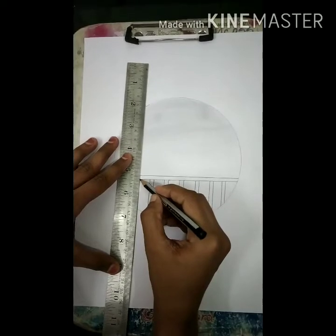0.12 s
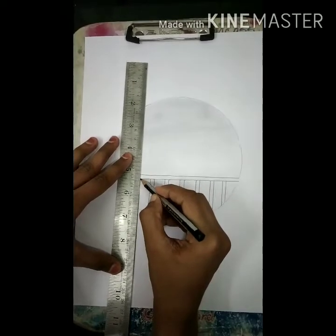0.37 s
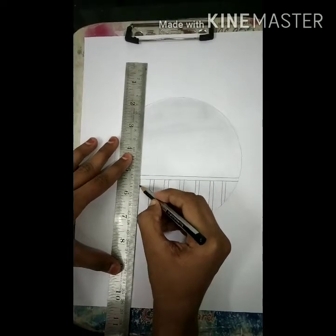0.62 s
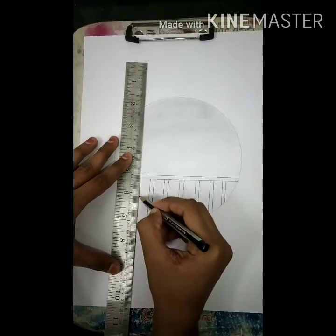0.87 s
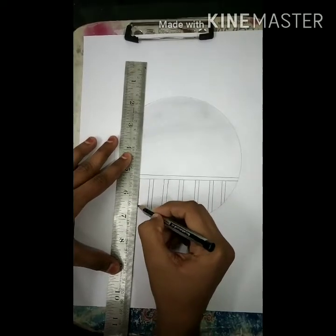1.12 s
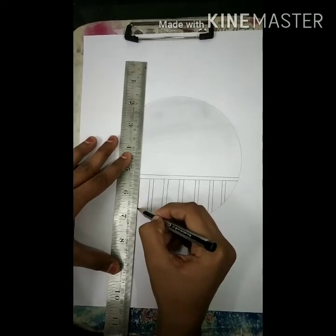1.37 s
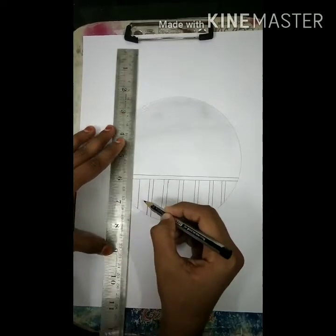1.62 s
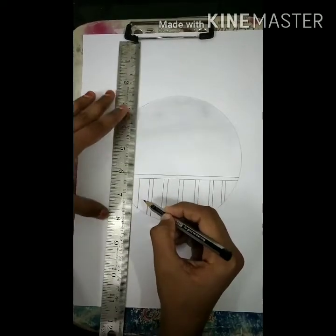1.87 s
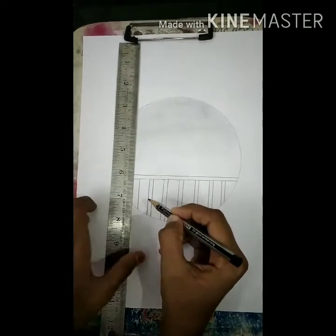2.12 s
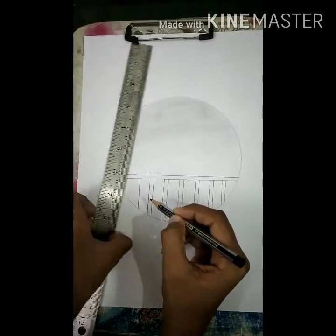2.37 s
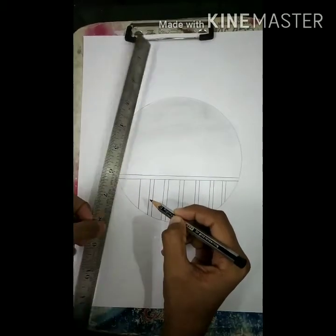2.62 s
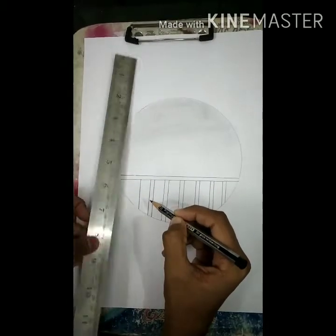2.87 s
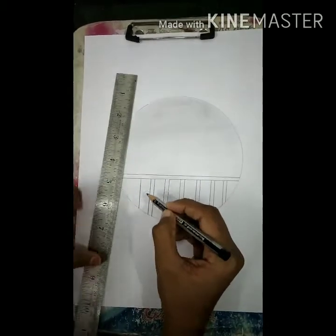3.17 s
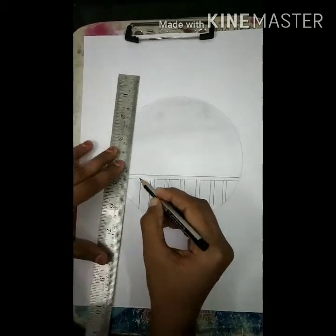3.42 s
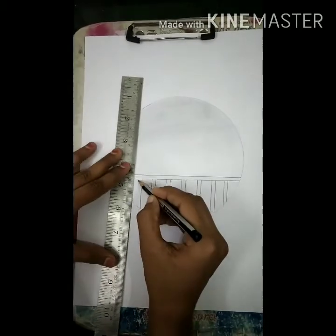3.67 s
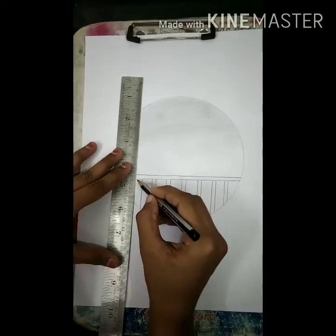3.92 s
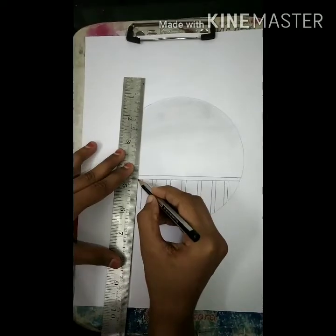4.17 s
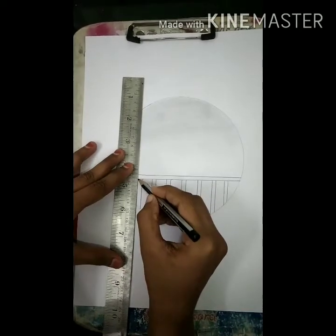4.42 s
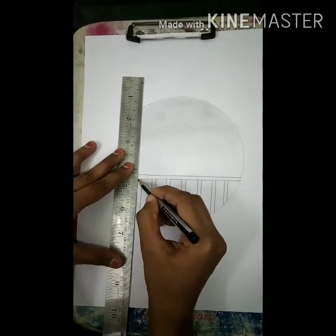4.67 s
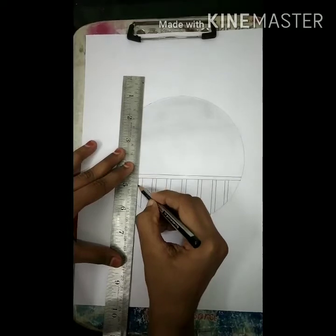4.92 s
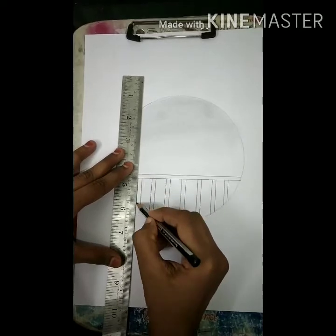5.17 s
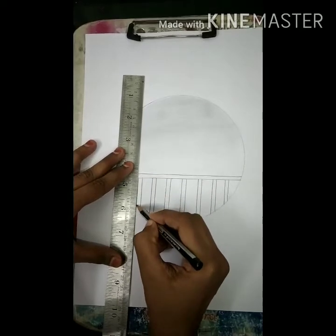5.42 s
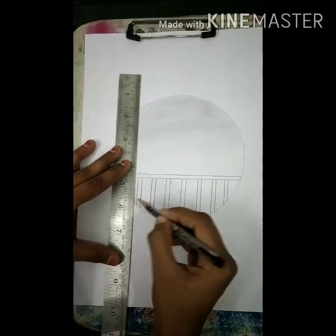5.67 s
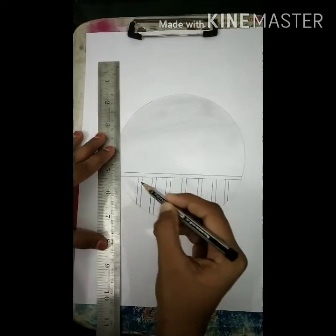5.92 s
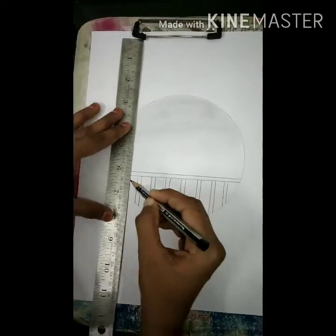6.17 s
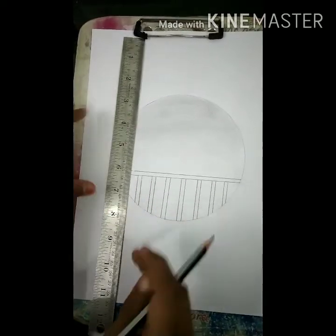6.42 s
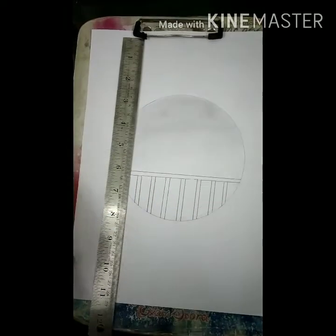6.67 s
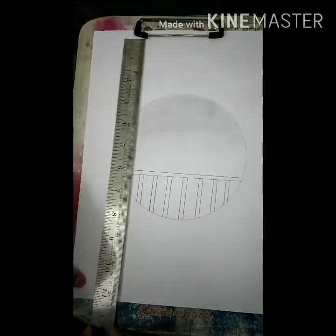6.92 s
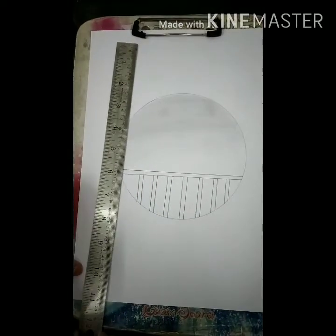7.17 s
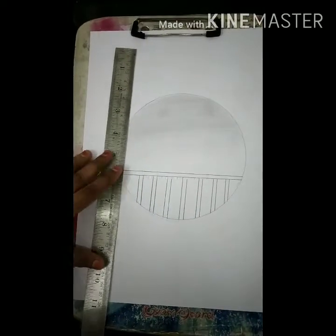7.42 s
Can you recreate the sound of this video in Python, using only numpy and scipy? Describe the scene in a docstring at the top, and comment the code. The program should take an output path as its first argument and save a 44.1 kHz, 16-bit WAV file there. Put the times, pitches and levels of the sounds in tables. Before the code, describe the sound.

Close stereo microphones at a desk in a small room with a steady fan drone. A faint pencil stroke hisses on paper, a loose part rattles, then a steel ruler scrapes and ticks, rings thinly and high, and lands with a flat slap and short buzz. After another rattle and a second pencil stroke come more papery slides, a sharp tick and a last rattle.

```python
"""Pencil and steel ruler on a clipboard

A hand draws two pencil lines along a steel ruler, then slides, lifts and drops the ruler.
Slides and pencil are coloured clicks of paper grain; ticks, slap and ringing steel are struck resonances.
A fan drones as shaped noise and shakes the desk; a loose part on it rattles three times as knocked modes.
Two close microphones listen: levels, delays and partly unlike noise differ between left and right.
"""
import sys
import numpy as np
from scipy import signal
from scipy.io import wavfile
from scipy.ndimage import uniform_filter1d

SR = 44100
rng = np.random.default_rng(int(sys.argv[2]) if len(sys.argv) > 2 else 0)


def log_audio(samples):
    """Write samples as a 16-bit WAV file to the path given in sys.argv[1]."""
    # one column per channel
    frames = np.atleast_2d(samples).T
    # limit to full scale, then quantise
    limited = np.clip(frames, -1, 1)
    pcm = np.round(limited * 32767).astype(np.int16)
    wavfile.write(sys.argv[1], SR, pcm)


def gain_from_db(level_db):
    """Convert decibel levels to linear amplitude factors (20 dB per decade)."""
    decades = np.asarray(level_db, float) / 20
    return 10 ** decades


N = 333043
LAG = 9  # samples between the microphones


def evened(x):
    """Scales to rms 1."""
    return x / np.sqrt(np.mean(x ** 2) + 1e-20)


def read(points, hz):
    """Reads a table on a log-frequency axis."""
    f, value = np.transpose(points)
    return np.interp(np.log(hz + 1), np.log(f + 1), value)


def add(mix, s, sound):
    """Adds a sound at time s."""
    part = mix[:, round(s * SR):][:, :sound.shape[-1]]
    part += sound[..., :part.shape[1]]


def resonate(x, hz, width):
    """Shifts the curve hz down to zero, smooths, and shifts back: a resonance of gain 1."""
    turn = np.exp(2j * np.pi * np.cumsum(hz * np.ones(len(x))) / SR)
    r = np.exp(-np.pi * width / SR)
    return 2 * (turn * signal.lfilter([1 - r], [1, -r], x / turn)).real


def grit(count, per_s, spread_db):
    """Sparse clicks of random sign, a few of them large."""
    size_db = spread_db * np.minimum(rng.exponential(1, count), 3.5)
    size = gain_from_db(size_db) * rng.choice([-1., 1.], count)
    return evened(size * (rng.random(count) < per_s / SR))


def wander(count, samples):
    """Slow random curve of rms 1: noise averaged over a number of samples."""
    return evened(uniform_filter1d(rng.standard_normal(count), samples))


def patchwork(shape, bins, frames):
    """Random patches of rms 1 over frequency and time."""
    noise = uniform_filter1d(rng.standard_normal(shape), bins, axis=0)
    return evened(uniform_filter1d(noise, frames, axis=1))


def placed(x, pan_db, lag):
    """Two channels with a level step and a delay of the right one."""
    return np.array([x * gain_from_db(pan_db / 2), np.roll(x, lag) * gain_from_db(-pan_db / 2)])


def swells(t, s, rise_s, fall_s, db, round_top=0.054):
    """Power of each event over time: a climb in dB to a rounded peak, then a fall."""
    late = t[:, None] - np.asarray(s)
    rising, falling = late / np.maximum(rise_s, .001), late / np.maximum(fall_s, .001)
    away = np.where(late < 0, rising, falling)
    return gain_from_db(2 * (db - 10 * (np.hypot(away, round_top) - round_top)))


# spectrum shape of the drone: f/Hz, density/dB per Hz
DRONE_SPECTRUM = [(18, -77), (30, -51), (55, -89), (108, -41), (188, -2.5), (251, 1.5), (440, -4.5),
                  (478, -8), (560, -8.5), (735, -9), (931, -6), (1490, -13), (2800, -22), (6480, -37.5),
                  (12800, -35.5), (15800, -33)]
# drone strength, swing weighted by frequency: t/s, level/dB
DRONE_LEVEL = [(0.0, -51), (1.14, -48), (1.47, -53), (1.81, -48.5), (1.85, -53.5), (2.63, -48.5),
               (2.78, -54), (3.39, -47), (4.5, -50), (4.64, -47.5), (5.61, -45.5), (5.84, -51), (5.92, -48),
               (6.12, -51), (6.41, -46), (7.0, -49.5), (7.55, -51)]
# drone at the two microphones: f/Hz, left over right/dB
DRONE_BALANCE = [(60, -8), (240, 1.5), (950, 0), (3770, 0), (15000, 1)]
# room resonances in the drone: f/Hz, width/Hz, lift/dB
ROOM_HUMS = [(210, 11.5, 2.5), (238.9, 9.6, 5.5), (278, 8, 1), (306, 12.3, 5), (363.7, 9.6, 3.5),
             (418, 19, 3), (449, 16, 4.5), (581, 30, 3.5), (906, 11, 2.5), (1038, 37, 2)]
MIC_SPACING_M = 0.17
FAN_SHARE, FAN_LAG_S = 0.25, 0.00026  # straight path from the fan, left microphone first


def drone():
    """Air noise of the fan with drifting patches, partly alike at both microphones."""
    frames, hz = N // 1024 + 5, np.fft.rfftfreq(4096, 1 / SR)
    a, b, c, d = rng.standard_normal((4, len(hz), frames))
    from_all_sides = np.sinc(2 * hz * MIC_SPACING_M / 343)
    straight = np.exp(-2j * np.pi * hz * FAN_LAG_S - (hz / 5000) ** 2)
    same = ((1 - FAN_SHARE) * from_all_sides + FAN_SHARE * straight)[:, None]
    left = a + 1j * b
    right = same * left + np.sqrt(np.maximum(1 - abs(same) ** 2, 0)) * (c + 1j * d)
    balance = gain_from_db(read(DRONE_BALANCE, hz) / 2)[:, None]
    level_db = np.interp(np.arange(frames) * 1024 / SR, *np.transpose(DRONE_LEVEL))
    bass_weight = np.clip(1.1 - 0.17 * np.log2(hz / 300 + 1), 0, 2)[:, None]  # mostly the bass swells
    swell_db = (level_db - level_db.mean()) * bass_weight
    hum_db = sum(db / (1 + (2 * (hz - f) / w) ** 2) for f, w, db in ROOM_HUMS)
    colour_db = (read(DRONE_SPECTRUM, hz) + hum_db)[:, None]
    patches_db = 1.4 * patchwork((len(hz), frames), 6, 8)
    z = np.array([left * balance, right / balance]) * gain_from_db(colour_db + patches_db + swell_db)
    sound = signal.istft(z, nperseg=4096, noverlap=3072)[1][:, :N]
    return gain_from_db(level_db.mean() + 3.0) * evened(sound)


# a hand leaning on the desk: t/s, rise/s per 10 dB, fall/s per 10 dB, level/dB
HAND_LEANS = [(0.7, .3, 0.073, -87), (2.14, 0.17, .15, -80), (2.54, 0.13, 0.18, -71.5),
              (2.98, .1, .15, -80), (6.22, 0.39, 0.5, -70.5), (7.3, 0.33, .4, -76.5)]
RUMBLE_DB, RUMBLE_DB_PER_DRONE_DB = -84.5, 1.3


def rumble():
    """Deep shaking of the desk: follows the drone, stronger when a hand leans on it."""
    band = signal.butter(2, [90, 140], "bandpass", fs=SR, output="sos")
    low = signal.sosfilt(band, rng.standard_normal((3, N)))
    t = np.arange(N) / SR
    drone_db = np.interp(t, *np.transpose(DRONE_LEVEL))
    steady = gain_from_db(RUMBLE_DB + RUMBLE_DB_PER_DRONE_DB * (drone_db - drone_db.mean()))
    leaning = swells(t, *np.transpose(HAND_LEANS)).sum(1)
    return evened(low[0] + 0.27 * low[1:]) * np.sqrt(steady ** 2 + leaning)


# base colour of paper friction: f/Hz, density/dB per Hz
PAPER_SPECTRUM = [(940, -23.5), (1600, -6), (3750, -7.5), (4210, -8.5), (4590, -8.5), (6670, -9),
                  (7200, -8.5), (11200, -7.5), (15800, -12.5)]
# ruler and hands sliding over paper:
# peak t/s, rise/ms per 10 dB, fall/ms per 10 dB, level/dB, brightness/dB per octave above 3300 Hz
SLIDE_EVENTS = [(0.15, 21, 120, -65.5, 3), (0.63, 270, 520, -63.5, -3), (0.83, 62, 64, -59.5, -3),
                (1.385, 48, 15, -55.5, 6), (1.404, 12, 45, -55, 5), (1.47, 60, 60, -65, 7),
                (1.525, 22, 13, -56, 2), (1.54, 16, 29, -45, 4), (1.565, 15, 26, -53, -8),
                (1.66, 150, 76, -59.5, 1.5), (1.99, 69, 206, -60, 3.5), (2.1, 10, 155, -56.5, 3),
                (2.14, 66, 32, -53, 3), (2.212, 46, 30, -54, 2), (2.3, 15, 60, -66, 3),
                (2.452, 4, 42, -59.5, -5.5), (2.47, 5, 41, -46.5, -1), (2.5406, 2.2, 6, -36, 1.5),
                (2.546, 2.5, 2.5, -35.5, 3.5), (2.55, 2, 4, -45, 4), (2.556, 5, 32, -50, -1),
                (2.597, 5, 8, -41, 3), (2.612, 10, 40, -52.5, 1), (2.657, 2, 2.5, -44, 4),
                (2.7, 40, 63, -61, 0), (2.737, 60, 35, -54, 7.5), (2.833, 21, 110, -59.5, 4),
                (2.858, 34, 20, -62, -2), (2.992, 0, 60, -43, -2.5), (3.035, 35, 142, -54, -6),
                (3.19, 20, 104, -56, 1), (3.31, 211, 65, -58.5, 1), (3.416, 4, 70, -51.5, -2),
                (3.68, 64, 76, -54.5, -4.5), (3.845, 46, 50, -64, 0), (4.126, 28, 146, -64, -5),
                (4.237, 10, 300, -65.5, -8), (4.396, 25, 100, -58, -5), (4.815, 110, 246, -59, -2),
                (5.045, 60, 54, -57.5, -5.5), (5.237, 197, 44, -64.5, -6), (5.386, 252, 200, -62.5, -6),
                (5.56, 40, 24, -55.5, 1), (5.6, 48, 46, -48.5, -0.5), (5.65, 27, 21, -55, 1),
                (5.77, 48, 54, -59.5, 1), (5.847, 46, 120, -53, 2.5), (5.93, 50, 60, -56, 4),
                (6.01, 80, 53, -52, 3.5), (6.177, 9, 10, -53, 5), (6.183, 2.5, 2, -43, 3.5),
                (6.2, 12, 100, -58, -1.5), (6.293, 100, 150, -59.5, -4), (6.55, 10, 142, -59.5, -5),
                (6.67, 34, 66, -60, 0), (6.883, 64, 293, -60, 2.5), (7.1, 60, 262, -57.5, -2.5),
                (7.287, 50, 300, -61, 4), (7.53, 100, 899, -56.5, 0.5)]
REST_DB, REST_TILT_DB_PER_OCTAVE = -70.5, -3  # faint hiss of resting hands


def slide():
    """Dense paper-fibre clicks coloured by the sheet, with a brightness for each slide."""
    rub = grit(N, 2500, 3.8)
    wide = np.array([grit(N, 4000, 1.8), grit(N, 4000, 2.3)])  # other spots under the long ruler
    clicks = 0.25 * placed(rub, -10.0, -LAG) + 0.93 * wide
    hz, t, z = signal.stft(clicks, SR, nperseg=256, noverlap=192)
    s, rise_ms, fall_ms, level_db, tilt_db = np.transpose(SLIDE_EVENTS)
    power = swells(t, s, rise_ms / 1000, fall_ms / 1000, level_db)
    rest = gain_from_db(2 * REST_DB)
    total = power.sum(1) + rest
    bright_db = (power @ tilt_db + rest * REST_TILT_DB_PER_OCTAVE) / total
    octaves = np.log2(np.maximum(hz, 3300) / 6500)[:, None]
    colour = gain_from_db(read(PAPER_SPECTRUM, hz)[:, None] + octaves * bright_db)
    colour /= np.sqrt(np.sum(colour[23:58] ** 2, axis=0) / 128)  # levels refer to about 4-10 kHz
    colour *= gain_from_db(1.87 * patchwork(colour.shape, 7, 24))  # the contact shifts, so bands come and go
    sound = signal.istft(z * colour, SR, nperseg=256, noverlap=192)[1][:, :N]
    z = signal.stft(sound, nperseg=1024, noverlap=768)[2]
    # narrow bands of the hiss drift in and out at random
    narrow_bands = evened(gain_from_db(3.4 * patchwork(z.shape[1:], 3, 12)))
    sound = signal.istft(z * narrow_bands, nperseg=1024, noverlap=768)[1][:, :N]
    judder = gain_from_db(1.04 * wander(len(t), 10))  # the motion catches and slips
    return sound * np.interp(np.arange(N) / SR, t, np.sqrt(total) * judder)


# ruler ticks: t/s, peak level/dB, centre f/Hz, left over right/dB, thud level/dB
RULER_TICKS = [(0.143, -42, 11000, 9, -72), (1.002, -38, 12000, 0, -60), (1.5613, -34.5, 3080, -2, -30.5),
               (2.0777, -18.5, 13000, 7, -29), (2.4681, -32, 8420, -6, -32), (2.5399, -17, 8300, -5, -37),
               (2.546, -19, 9400, -8, -57), (2.5978, -30, 9400, -4, -43), (2.6568, -22.5, 11300, -7, -60),
               (2.8465, -56, 2530, 1, -30), (2.862, -50, 2530, 1, -37), (3.4118, -38, 10800, -5, -49),
               (6.0413, -48, 2100, -10, -36), (6.2717, -23, 7040, 2.5, -46)]
# clipboard modes: f/Hz, level/dB, t60/s
BOARD_MODES = [(960, -12, 0.016), (1380, -9, 0.018), (1935, 3.5, 0.0091), (2235, 2.5, 0.01)]
CRACK_T60_S, BITE_WIDTH_PER_HZ = 0.0066, 0.82  # width of each resonator over its centre


def tick(s, peak_db, hz, pan_db, thud_db):
    """A steel edge scuffs the board: a short burst of grit and a dull thud."""
    t = np.arange(SR // 8) / SR
    scuffs = rng.standard_normal((3, len(t))) * gain_from_db(-60 * t / CRACK_T60_S) * np.tanh((t / .0003) ** 2)
    scuffs[0, 8] += 5.0  # the edge bites once
    width = BITE_WIDTH_PER_HZ * hz
    crack = np.array([resonate(resonate(x, hz, width), hz, width) for x in scuffs])
    crack = signal.lfilter([1, -2, 1], [1, -1.5, .6], crack)  # a thin edge radiates no bass
    thud = sum(gain_from_db(db - 60 * t / t60) * np.sin(2 * np.pi * f * t) for f, db, t60 in BOARD_MODES)
    thud *= np.tanh(t / 0.0004)
    sound = gain_from_db(peak_db) * crack / abs(crack[0]).max()
    lag = LAG if pan_db > 1.5 else -LAG  # the nearer microphone hears it first
    near = np.pad(sound[0] + gain_from_db(thud_db) * thud, LAG)
    wide = np.pad(sound[1:], ((0, 0), (LAG, LAG)))
    return s - LAG / SR, placed(near, pan_db, lag) + .6 * wide


# decay of the room: f/Hz, t60/s
ROOM_DECAY = [(300, 0.15), (2000, 0.35), (6000, 0.17), (14000, 0.05)]


def room(x):
    """Sparse taps of random sign, each band dying at its own speed."""
    taps = np.zeros((2, SR // 2))
    grid = np.arange(200, SR // 2 - 20, 20)
    at = grid + rng.integers(0, 20, (2, len(grid)))
    np.put_along_axis(taps, at, rng.choice([-1., 1.], at.shape), 1)
    hz, t, z = signal.stft(taps, SR, nperseg=256)
    tail = signal.istft(z * gain_from_db(-60 * t / read(ROOM_DECAY, hz)[:, None]), SR, nperseg=256)[1]
    return signal.fftconvolve(x, tail / np.linalg.norm(tail[0]), axes=1)[:, :N]


# pencil strokes: t/s, length/s, pressure level/dB, tip f/Hz, drift/Hz per s
PENCIL_STROKES = [(0.332, 0.836, -63, 12460, -650), (4.62, 0.493, -57.5, 11900, 1200)]
STROKE_ATTACK_S, STROKE_RELEASE_S, TIP_LAG = 0.27, 0.11, -4  # lag in samples


def stroke(s, length, pressure_db, start_hz, drift):
    """The lead catches on the paper grain and rings at its tip."""
    t = np.arange(0, length, 1 / SR)
    hz = start_hz + drift * t + 250 * wander(len(t), 2500)  # the grip shifts
    tips = [resonate(resonate(grit(len(t), 2000, 3.8), hz, 1600), hz, 1700) for _ in range(3)]
    sound = 0.7 * placed(tips[0], -.8, TIP_LAG) + 1.1 * np.array(tips[1:])
    press = np.minimum(np.minimum(t / STROKE_ATTACK_S, (length - t) / STROKE_RELEASE_S), 1)
    catch = gain_from_db(1.6 * wander(len(t), 300))  # the lead drags and frees
    return s, gain_from_db(pressure_db) * evened(sound) * catch * press ** 1.5


# rattles: t/s, attack/s, hold end/s after start, shaking level/dB, hardest knock/s after start
RATTLE_EVENTS = [(1.24, .003, 0.033, -44, .003), (3.912, 0.02, 0.12, -43.5, 0.077),
                 (6.63, 0.026, 0.11, -46, .02)]
# modes of the loose part, struck at a different spot in each rattle:
# f/Hz, width/Hz (x 2.2 in each resonator), level/dB in rattle 1, 2, 3
LOOSE_MODES = [(716, 30, -23, -5, -22), (780, 57, -8, -7, -3), (1000, 26, 1, -4.5, -8.5),
               (1224, 31, -9, -6, -6), (1428, 24, -4, -7, -14), (1632, 23, -5, -3, 0.5),
               (1822, 46, -13, -7.5, -6), (2305, 43, -10, -7.5, -2), (2440, 52, -5.5, -7, -1),
               (2730, 30, -24, -20, -14), (3170, 40, -26, -18, -13), (3260, 68, -19, -18, -9),
               (4080, 70, -23, -21, -14), (4320, 50, -27, -27, -13.5), (4770, 32, -30, -24, -22)]
RATTLE_FALL_DB_PER_S, RATTLE_TAIL_S, RATTLE_LAG = 157, .14, -11  # lag in samples


def rattle(s, attack_s, hold_s, shaking_db, hardest_s, spot):
    """Quick uneven knocks ring the modes of a loose part."""
    t = np.arange(0, hold_s + RATTLE_TAIL_S, 1 / SR)
    flex = 1 + 0.012 * wander(len(t), 1200)  # the part bends, so its pitch wavers
    rung = []
    for _ in range(3):
        knocks = grit(len(t), 1200, 2.9)
        knocks[round(hardest_s * SR)] += 17.0
        casing = gain_from_db(-11.0) * evened(resonate(resonate(knocks, 1800, 2600), 1800, 2600))
        modes = sum(gain_from_db(db[spot]) * evened(resonate(resonate(knocks, f * flex, 2.2 * w), f * flex, 2.2 * w))
                    for f, w, *db in LOOSE_MODES)
        rung.append(modes + casing)
    by_walls = np.array(rung[1:])
    sound = evened(placed(rung[0], 0.82, RATTLE_LAG) + 1.36 * by_walls)
    fall_db = RATTLE_FALL_DB_PER_S * np.maximum(t - hold_s, 0)
    shake = np.minimum(t / attack_s, 1) * gain_from_db(shaking_db - fall_db)
    return s, shake * sound * signal.windows.tukey(len(t), .02)


# groans of the board: t/s, rise/s per 10 dB, fall/s per 10 dB (under 0.001 s counts as 0.001 s), level/dB
BOARD_GROANS = [(2.18, .08, -0.06, -50), (2.55, -0.2, 0.15, -55), (2.852, .01, 0.1, -53),
                (2.992, 0.01, 0.09, -45), (5.6, -0.04, -0.06, -56)]


def groan():
    """Rough low buzz of the board while steel scrapes or hits it."""
    grains = [grit(N, 900, 2.5) for _ in range(3)]
    body = np.array([resonate(x, 470, 340) + 0.6 * resonate(x, 940, 500) for x in grains])
    body = signal.sosfilt(signal.butter(3, 170, "highpass", fs=SR, output="sos"), body)
    power = swells(np.arange(N) / SR, *np.transpose(BOARD_GROANS)).sum(1)
    return evened(body[0] + 0.56 * body[1:]) * np.sqrt(power)


# knocks on the free ruler: t/s, level/dB
RULER_PINGS = [(2.479, -47), (2.541, -53), (2.607, -58), (2.7, -57), (2.76, -62)]
# close pair of ruler modes: f/Hz, level/dB
STEEL_MODES = [(8420, 0), (8432, -18)]
PING_RISE_S, PING_FALL_S_PER_10_DB = .004, 0.12  # rise: time constant


def ping():
    """The lifted ruler rings in one high pair of modes; each knock restarts the ring."""
    s, level_db = np.transpose(RULER_PINGS)
    t = np.arange(s[0], s[-1] + .3, 1 / SR)
    last = np.searchsorted(s, t, "right") - 1
    decay = gain_from_db(level_db[last] - 10 * (t - s[last]) / PING_FALL_S_PER_10_DB)
    level = resonate(decay, 0, 1 / (np.pi * PING_RISE_S)) / 2  # smooths the onsets
    ring = sum(gain_from_db(db) * np.sin(2 * np.pi * hz * t) for hz, db in STEEL_MODES)
    touch = gain_from_db(2.2 * wander(len(t), 500))  # fingers brush the steel
    return t[0], placed(evened(ring) * level * touch, -2.1, -LAG)


# landings as the ruler rocks on either end and bounces: delay/ms, level/dB, left over right/dB
SLAP_LANDINGS = [(0, -1.5, 6), (.4, -10, 12), (.62, -15, -12), (1.2, -11, 7), (1.48, -4, -8),
                 (1.87, -18, -17), (2.35, -15, 5)]
SLAP_S, SLAP_IMPULSE_DB, SLAP_LAG = 2.98853, -10.5, -2  # impulse level ahead of the filters; lag in samples


def slap():
    """The ruler lands flat and rocks: one dull snap repeated."""
    blows = np.zeros((2, N))
    for delay_ms, db, pan_db in SLAP_LANDINGS:
        blow = -gain_from_db(SLAP_IMPULSE_DB + db) * signal.unit_impulse(8, 4)
        add(blows, SLAP_S + delay_ms / 1000, placed(blow, pan_db, SLAP_LAG))
    snap = []
    for x in blows:
        dull = resonate(resonate(resonate(x, 3900, 5800), 3900, 5800), 3900, 5800)
        snap.append(dull + 0.55 * resonate(x, 7400, 3000))
    return 2.8 * signal.lfilter([1, -1], [1, -.85], snap)


# modes of the ruler lying on the board: f/Hz, width/Hz (x 2.1 in the resonator), level/dB
FLAT_MODES = [(2514, 60, -12), (2750, 40, -7), (3470, 68, 0), (3730, 50, -4), (4300, 70, -1),
              (4800, 55, -3), (5800, 50, -2), (7200, 60, -5), (8730, 80, -7)]
CHATTER_DB, CHATTER_HOLD_S, CHATTER_FALL_DB_PER_S = -43, 0.068, 250


def chatter():
    """After the slap the ruler trembles on the board and its modes buzz."""
    t = np.arange(0, .25, 1 / SR)
    knocks = grit(len(t), 450, 4.1), grit(len(t), 450, 3.8)
    rung = [sum(gain_from_db(db) * evened(resonate(x, f, 2.1 * w)) for f, w, db in FLAT_MODES) for x in knocks]
    fall_db = CHATTER_FALL_DB_PER_S * np.maximum(t - CHATTER_HOLD_S, 0)
    return SLAP_S, evened(np.array(rung)) * np.tanh(t / .005) * gain_from_db(CHATTER_DB - fall_db)


def scene():
    """Desk sounds over the drone; ticks and slap get a room tail."""
    hits, rest = slap(), drone() + rumble() + slide() + groan()
    for row in RULER_TICKS:
        add(hits, *tick(*row))
    for row in PENCIL_STROKES:
        add(rest, *stroke(*row))
    for spot, row in enumerate(RATTLE_EVENTS):
        add(rest, *rattle(*row, spot))
    add(rest, *ping())
    add(rest, *chatter())
    # small parts move no bass
    hits = signal.sosfilt(signal.butter(2, 400, "highpass", fs=SR, output="sos"), hits)
    return hits + gain_from_db(-15.0) * room(hits) + rest


def band_limit(x):
    """A steep low-pass at the top of the band."""
    return signal.sosfilt(signal.butter(12, 16680, fs=SR, output="sos"), x)


def record(dry):
    """The treble ends early, at a steep low-pass."""
    edge_hz = 15450
    dull = signal.oaconvolve(dry, signal.firwin(201, edge_hz, fs=SR)[None], "same")
    return band_limit(dull)


dry = scene()
out = record(dry)
log_audio(out)
```